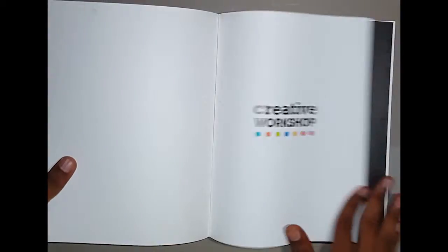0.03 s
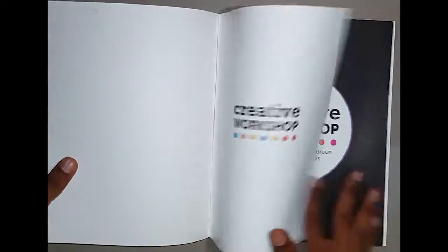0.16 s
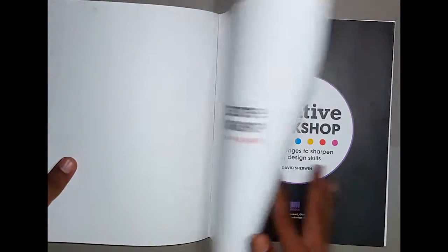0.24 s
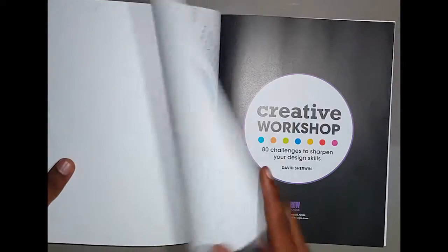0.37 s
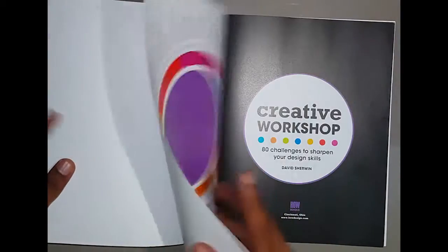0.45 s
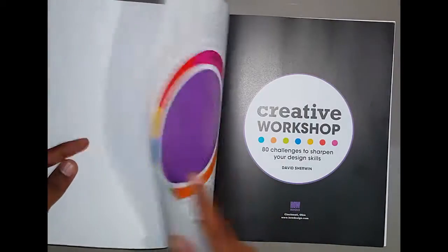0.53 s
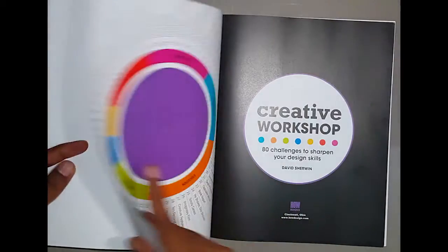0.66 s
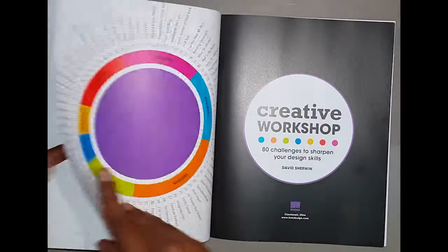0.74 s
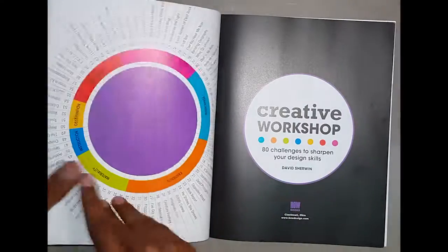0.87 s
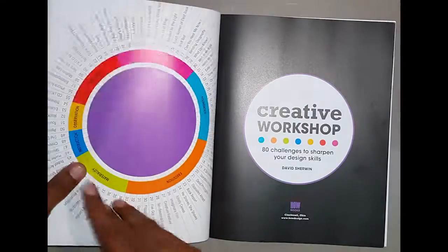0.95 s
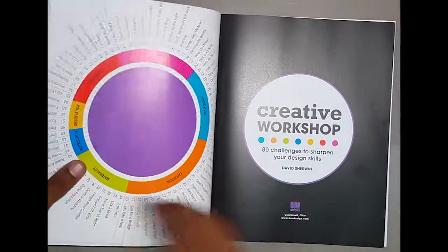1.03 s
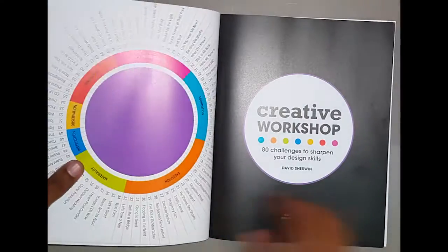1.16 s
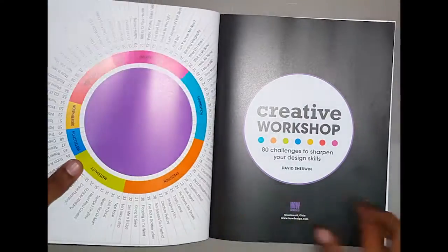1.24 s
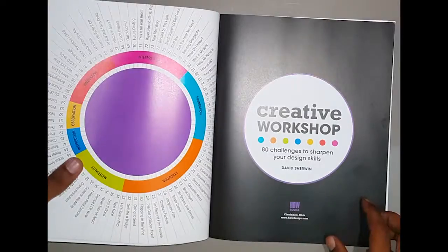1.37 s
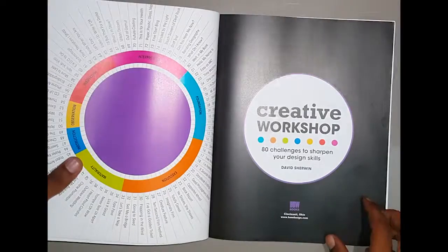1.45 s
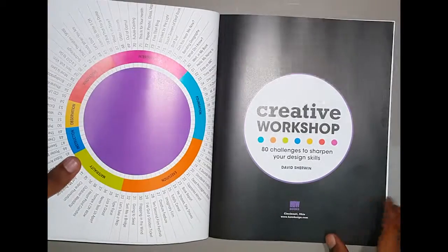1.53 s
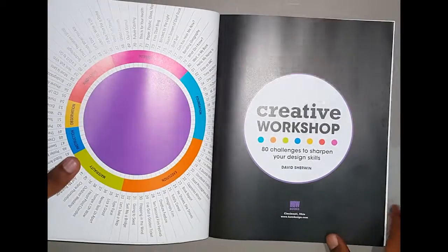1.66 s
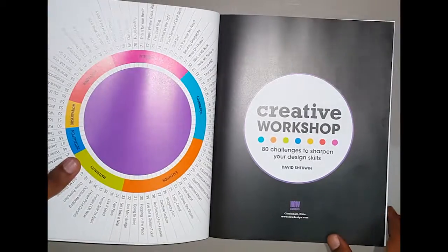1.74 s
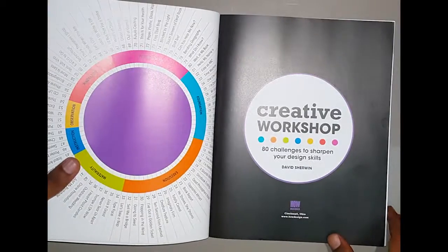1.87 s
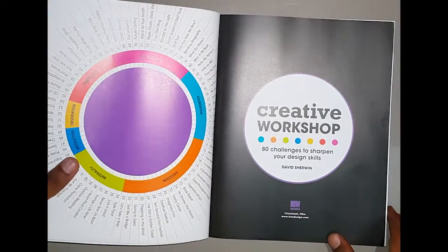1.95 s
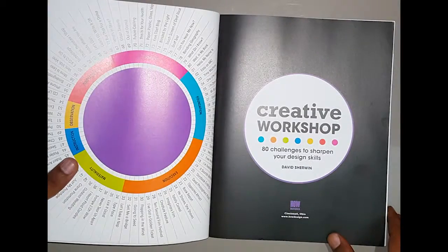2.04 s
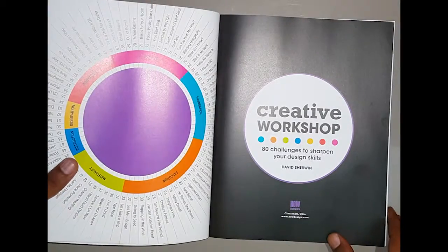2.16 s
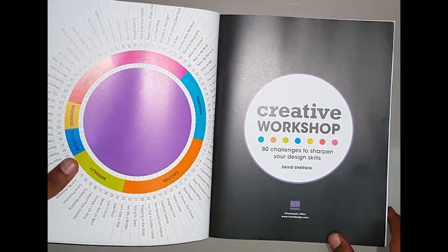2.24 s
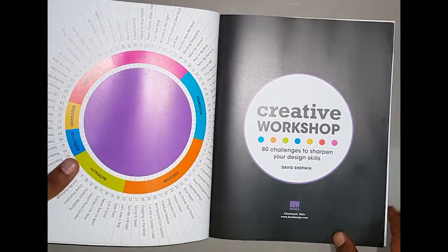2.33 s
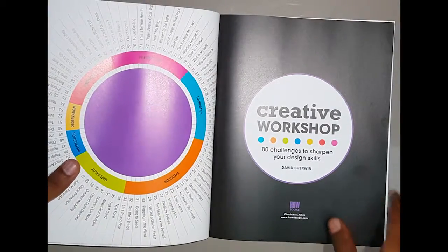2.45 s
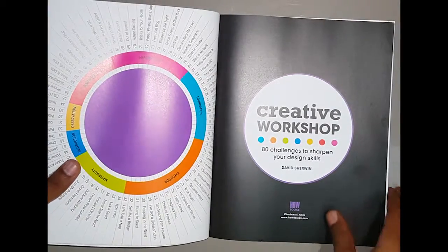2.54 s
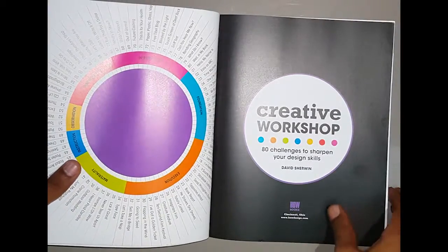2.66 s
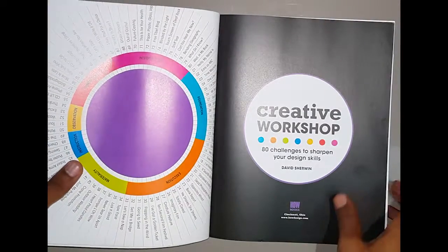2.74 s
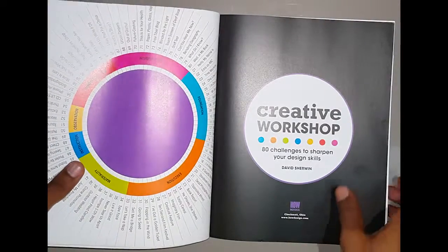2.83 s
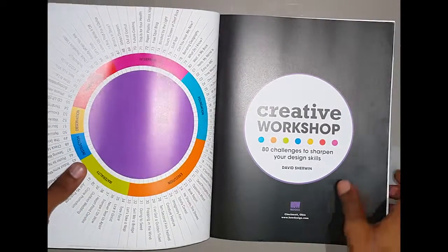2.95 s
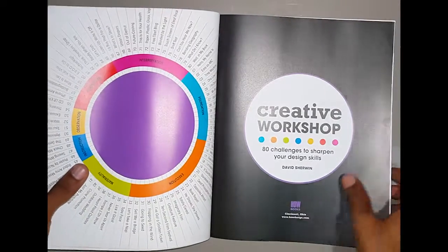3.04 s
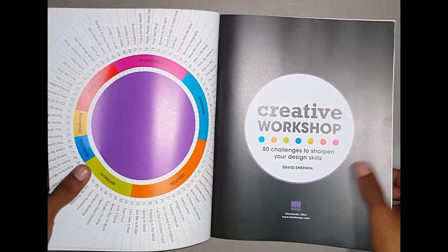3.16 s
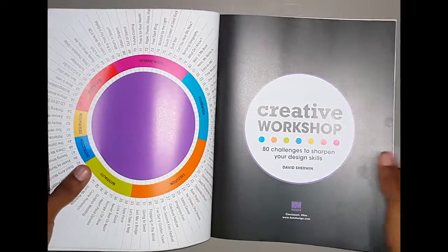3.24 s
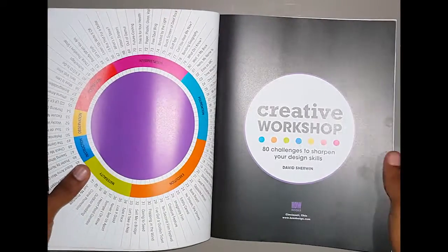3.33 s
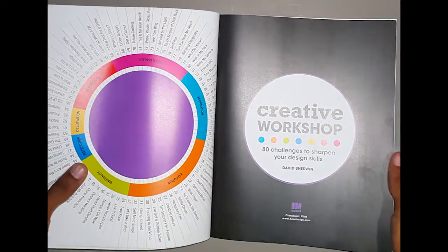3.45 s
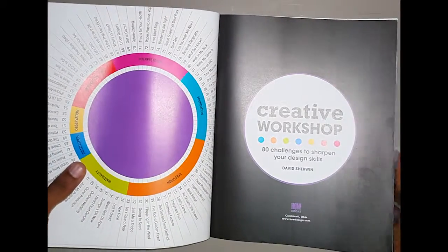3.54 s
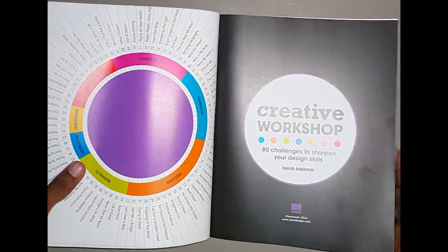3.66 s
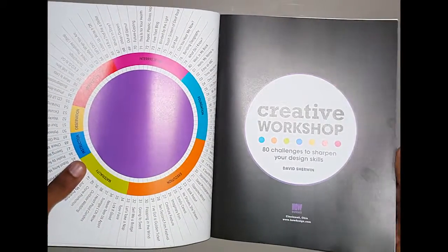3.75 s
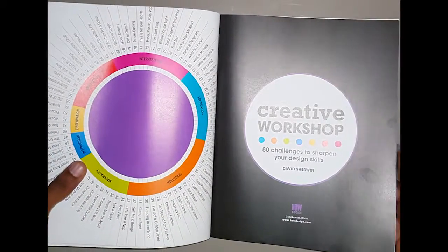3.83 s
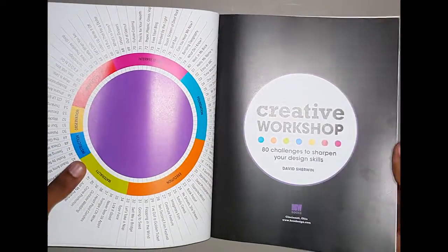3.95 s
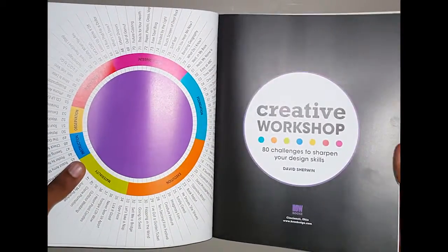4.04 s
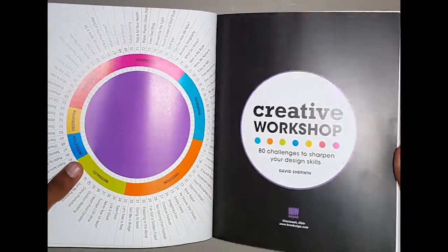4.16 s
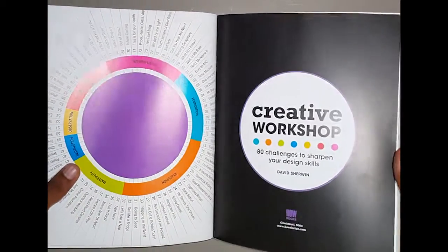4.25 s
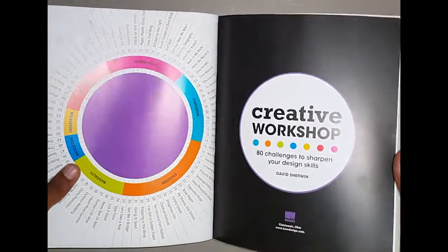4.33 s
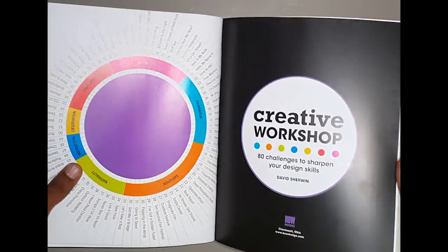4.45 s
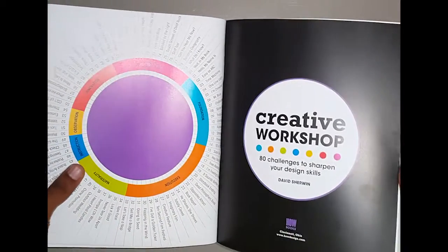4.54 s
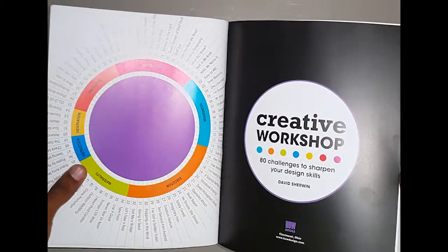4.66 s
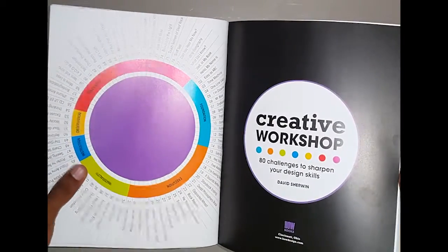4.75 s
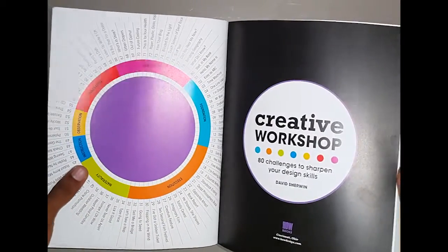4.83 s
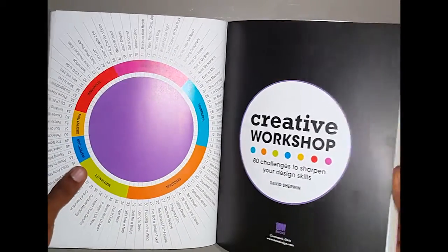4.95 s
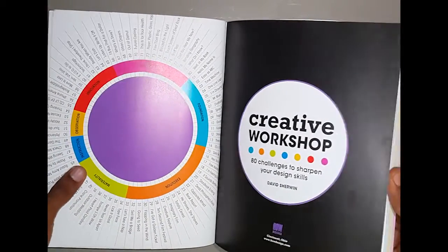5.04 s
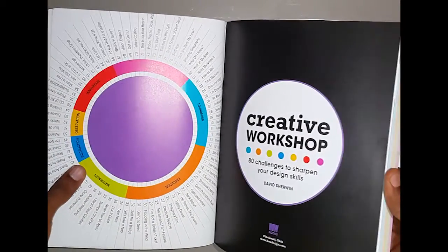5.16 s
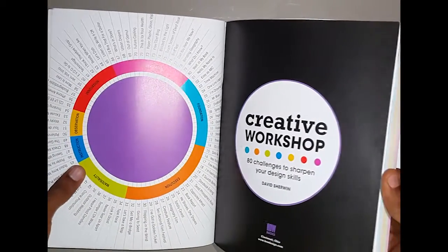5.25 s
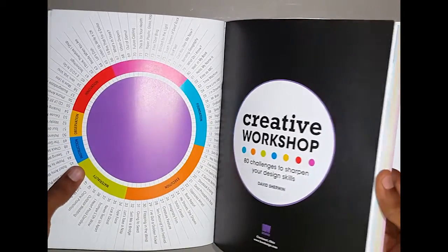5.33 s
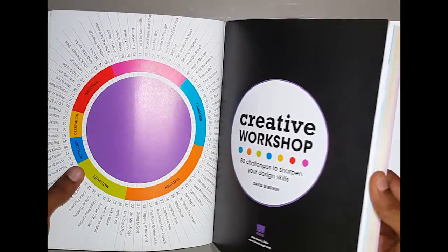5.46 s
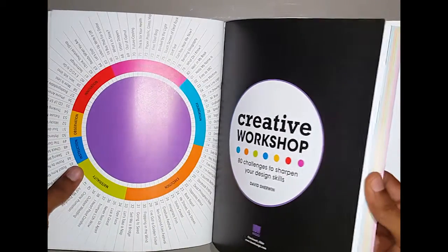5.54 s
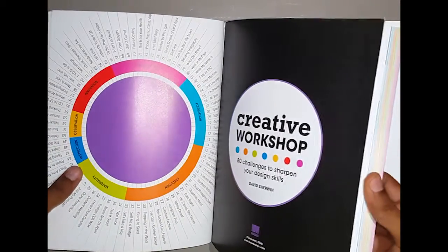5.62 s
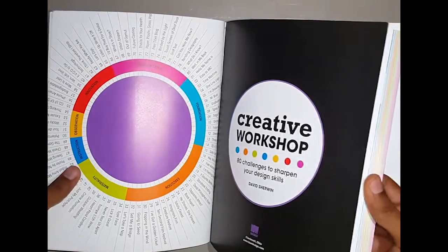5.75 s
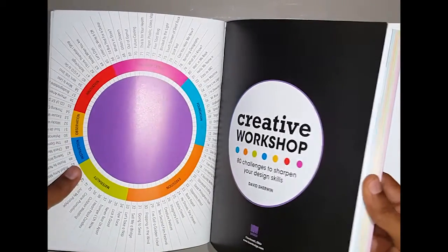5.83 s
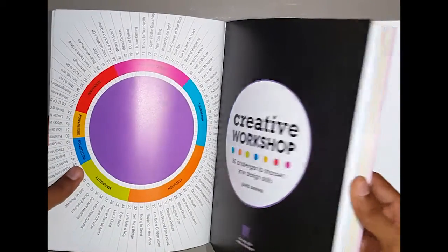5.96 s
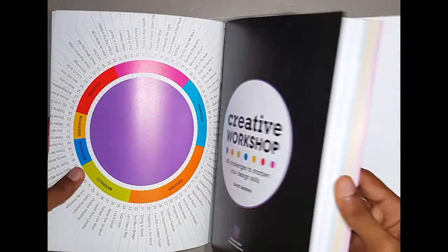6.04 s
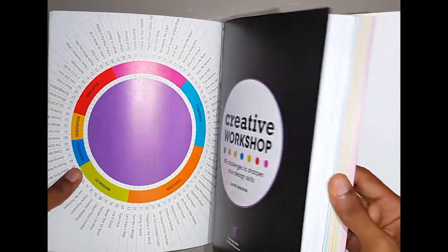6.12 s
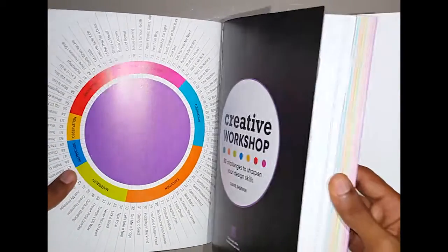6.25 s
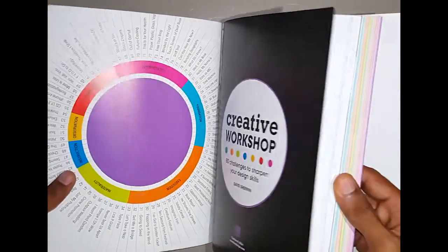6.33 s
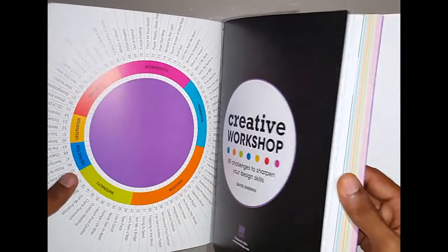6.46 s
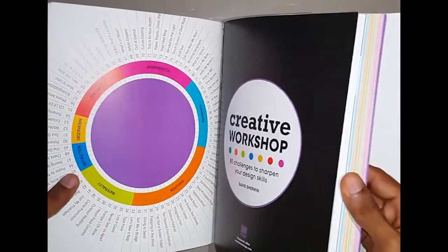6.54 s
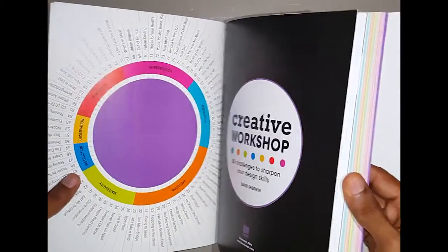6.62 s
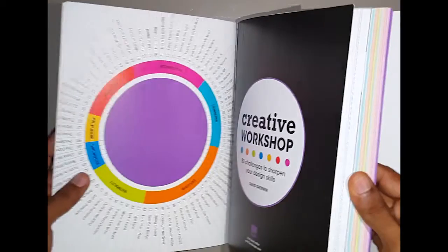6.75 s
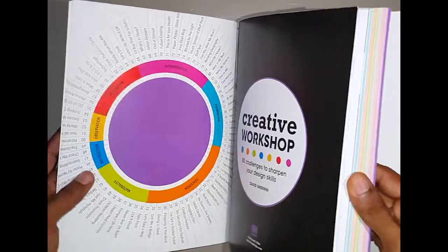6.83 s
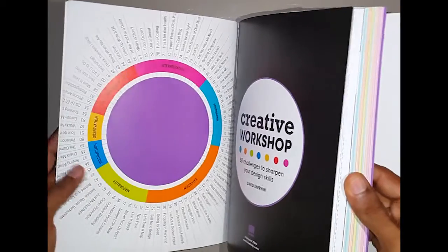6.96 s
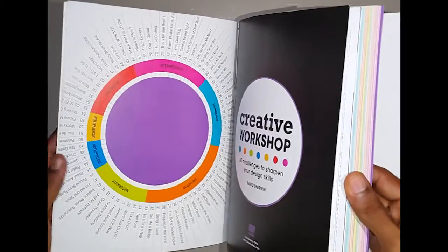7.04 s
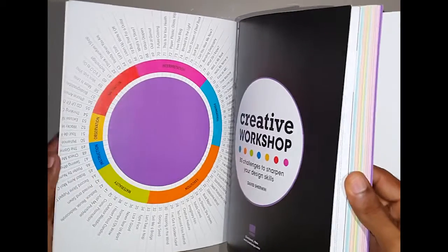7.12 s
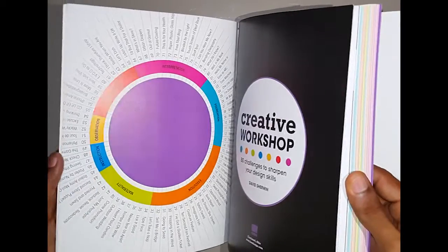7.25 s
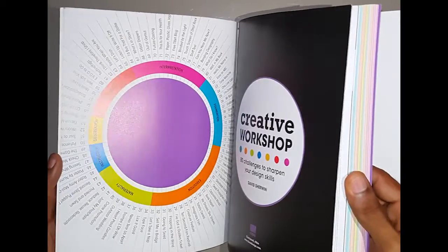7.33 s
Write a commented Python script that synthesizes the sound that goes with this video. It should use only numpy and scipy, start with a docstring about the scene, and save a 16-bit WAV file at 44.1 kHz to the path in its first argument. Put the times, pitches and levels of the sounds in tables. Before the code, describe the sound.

A large paperback page is swished over with crackling snaps and smoothed flat, then quiet handling, soft hollow table thumps and a final heavier knock.

```python
"""In a small room, a large paperback lies open on a hollow wooden table.
One page is turned and smoothed; fingers tap and lift the edge. Paper is shaped noise: grainy hiss for
sliding, dense bursts and clicks for snaps, single resonances for pitched pops, taps and a scrape. Thumps,
shifting weight and the paper drive modes of table and close walls, which two spaced microphone ports hear
with different strength and sign. Behind lie distant rumble, amplifier hiss and faint high tones."""
import sys
import numpy as np
from scipy import signal
from scipy.fft import rfft, irfft
from scipy.io import wavfile
from scipy.ndimage import uniform_filter1d

SR = 44100
rng = np.random.default_rng(int(sys.argv[2]) if len(sys.argv) > 2 else 0)


def inscribe(sig):
    """Save sig as 16-bit PCM at rate SR to the path in sys.argv[1].

    A 1-D sig is mono; a 2-D sig holds one channel per row.
    Samples are clipped to [-1, 1] before scaling.
    """
    pcm = np.round(np.clip(np.atleast_2d(sig).T, -1, 1) * 32767)
    wavfile.write(sys.argv[1], SR, pcm.astype(np.int16))


def level_to_linear(level):
    """Convert decibel levels to linear amplitude factors, elementwise."""
    exponent = np.asarray(level, float) / 20
    return 10 ** exponent


N = 325899

# paper snaps and finger taps: (time [s], level [dB],
# hollow part against that level [dB], sheen against that level [dB])
SNAPS = [(0.1094, -35.5, -6.5, 1.5), (0.2761, -31, 1, -2), (0.3978, -57, 19, -18), (0.5295, -45.5, -14, -2),
         (0.5575, -41.5, 0.5, 7), (0.5895, -29, -6.5, -10), (0.6257, -28.5, -9, -34),
         (0.7035, -49.5, 10.5, 1.5), (0.7775, -45, 4.5, -6), (0.8325, -50, -3, -4.5),
         (0.9938, -49.5, -1, 4), (1.0333, -64, 21.5, -15), (1.0897, -21.5, -6.5, -13),
         (1.4388, -46.5, -10, -7), (1.464, -45, -13.5, -9), (1.641, -41.5, -38, -3.5),
         (2.4428, -38, -46, -12), (2.8816, -58, 2, -12), (2.959, -52.5, 7.5, -11),
         (3.1379, -58.5, 2.5, -37), (3.3067, -57.5, 1, 3), (3.464, -58.5, 3.5, -22),
         (3.8134, -71.5, 19.5, -11), (4.044, -57.5, -1, -2), (4.111, -54.5, -4, -3.5),
         (4.142, -49.5, 5, -26), (4.3179, -48, 5, -36), (4.49, -51.5, -20, 2), (4.905, -35, -11, -1),
         (4.9414, -43.5, 0, 0.5), (5.1066, -53, 4, -24), (5.252, -51, -5, -7), (5.7329, -61.5, 12.5, 4.5),
         (5.7837, -59, 10.5, 3.5), (5.8365, -61, 12.5, 2.5), (6.3285, -63.5, 16, 2), (6.3765, -52, 9, -1),
         (6.4224, -54.5, 6.5, 2), (6.477, -59.5, 7.5, 0), (6.5224, -42.5, 0.5, -10),
         (6.5679, -50, 7.5, -23), (6.819, -42, -1.5, -12.5), (6.9952, -56, 14, 1), (7.1046, -52.5, -10, -6),
         (7.1305, -55, 7, 4.5), (7.2612, -51.5, -1, -21)]
DEEP_BELOW_HZ = 190   # the deep modes of the table


def rms_one(x):
    """Scales to rms 1."""
    return x / np.sqrt(np.mean(x ** 2) + 1e-20)


def at_hz(points, hz):
    """Reads a table by straight lines on a log-frequency axis."""
    table_hz, values = np.transpose(points)
    return np.interp(np.log(np.maximum(hz, 1)), np.log(table_hz), values)


def in_time(rows):
    """Joins the rows of a curve by straight lines in time."""
    s, *columns = np.transpose(rows)
    return [np.interp(np.arange(N) / SR, s, column) for column in columns]


def drift(rate_hz):
    """Slow random wander of spread 1: noise through two equal one-pole low-passes."""
    r = np.exp(-2 * np.pi * rate_hz / SR)
    noise = rng.standard_normal(N + SR)
    settled = signal.lfilter([1], [1, -2 * r, r * r], noise)[SR:]
    return rms_one(settled)


def swell_at(middle_s, length_s):
    """A smooth rise and fall, with the sample at which it starts."""
    return np.hanning(round(length_s * SR)), round((middle_s - length_s / 2) * SR)


def coloured(x, spectrum):
    """Minimum-phase filter with the given dB curve and unit power gain: nothing sounds early."""
    size = 4096
    cepstrum = irfft(np.log(level_to_linear(at_hz(spectrum, np.fft.rfftfreq(size, 1 / SR)))))
    # fold the cepstrum onto positive time
    cepstrum[1:size // 2] *= 2
    cepstrum[size // 2 + 1:] = 0
    pulse = irfft(np.exp(rfft(cepstrum)))
    return signal.fftconvolve(x, pulse / np.sqrt(np.sum(pulse ** 2)))[:N]


def ring(force, hz, t60_s):
    """Two-pole resonance: a unit click starts a wave of height 1; steady pressure makes no sound."""
    r, w = level_to_linear(-60 / (t60_s * SR)), 2 * np.pi * hz / SR
    return signal.lfilter([.5, 0, -.5], [1, -2 * r * np.cos(w), r * r], force + 1e-18)


def paper(slide_db):
    """Sliding is grainy friction, dull from the sheet, bright from its surface; snaps, brushes are bursts."""
    # spectra of the parts: (frequency [Hz], level [dB])
    dull_colour = [(350, -56), (600, -7.5), (821, -1.5), (1000, 2.5), (1170, -7.5), (2180, -3), (3470, -9),
                   (5450, -19.5), (9000, -13), (15600, -19.5), (22000, -120)]
    hollow_colour = [(150, -27), (350, -9.5), (650, -8), (1000, 4), (1200, -5.5), (1500, -13), (4000, -53)]
    crisp_colour = [(600, -12), (1400, 0), (2300, 4.5), (5000, -10), (9000, -39)]
    sheen_colour = [(1470, -15.5), (2500, -3.5), (4040, 9.5), (4900, 4), (5600, 8), (7000, 1.5), (9000, -4),
                    (15500, -7)]
    crackle_db = 4.5   # unevenness of brushes and snaps
    envelopes = snap_envelopes() + brush_envelopes()
    crackle = level_to_linear(crackle_db * drift(250)) * rng.standard_normal((3, N))
    hollow, crisp, sheen = envelopes * crackle
    hollow_clicks, crisp_clicks = snap_clicks()

    dull = level_to_linear(slide_db) * fibres(400, grain_db=-6.5, clump_db=5.5)
    # louder sliding is brighter: the sheen lies 8 dB under the slide at -65 dB
    sheen_db = -8 + 0.8046 * (slide_db + 65)
    bright = level_to_linear(slide_db + sheen_db) * fibres(2900, grain_db=-26.0, clump_db=1.5)

    sound = coloured(dull, dull_colour) + coloured(bright + sheen, sheen_colour)
    sound += coloured(hollow + hollow_clicks, hollow_colour)
    sound += coloured(crisp + crisp_clicks, crisp_colour)
    return sound + whisks() + pitched_paper()


def fibres(per_s, grain_db, clump_db):
    """Friction of paper: smooth hiss with clumped tiny slips on it; rms 1."""
    chance = per_s * level_to_linear(clump_db * drift(20)) / SR
    size = level_to_linear(5.6 * np.minimum(rng.exponential(1, N), 5))
    slips = (rng.random(N) < chance) * size * rng.choice([-1, 1], N)
    hiss = rng.standard_normal(N)
    return rms_one((hiss + level_to_linear(grain_db) * rms_one(slips)) * level_to_linear(0.64 * drift(66)))


def snap_envelopes():
    """Each snap rises fast and dies away: hollow part, crisp part and sheen, each at its own rate."""
    rise_s = 0.00066   # time constant
    t60_s = np.array([[0.014], [0.028], [0.032]])   # hollow, crisp, sheen
    out = np.zeros((3, N))
    for s, level_db, hollow_db, sheen_db in SNAPS:
        at = round(s * SR)
        t = np.arange(min(round(.1 * SR), N - at)) / SR
        rise = 1 - np.exp(-t / rise_s)
        part_db = level_db + np.array([[hollow_db], [0], [sheen_db]])
        out[:, at:at + len(t)] += rise * level_to_linear(part_db - 60 * t / t60_s)
    return out


def snap_clicks():
    """The first contact of each snap is a single click, in the hollow and in the crisp part."""
    s, level_db, hollow_db, _ = np.transpose(SNAPS)
    clicks = np.zeros((2, N))
    clicks[:, np.round(s * SR).astype(int)] = level_to_linear([level_db + hollow_db + 17, level_db + 14])
    return clicks


def brush_envelopes():
    """Fingertips brush the page: each brush swells and fades evenly, with no hollow part."""
    # (middle [s], level [dB], sheen against that level [dB], length [s])
    brushes = [(0.091, -62.5, 3, 0.06), (0.596, -46.5, -38, 0.19), (0.687, -50, -23, 0.077),
               (0.972, -50, -5.5, 0.06), (1.153, -56.5, -16, 0.13), (1.454, -57.5, 8, 0.052),
               (1.539, -62.5, -9, 0.028), (1.633, -61.5, 2, 0.083), (1.693, -58.5, 4, 0.026),
               (1.898, -66, -2, 0.21), (2.092, -64.5, 2.5, 0.051), (2.502, -72, 3, 0.14),
               (2.895, -58, -0.5, 0.06), (4.865, -63.5, -1, 0.02), (5.032, -59.5, 0, 0.086),
               (5.374, -69.5, 1, 0.13), (6.517, -57.5, 4.5, 0.021), (6.705, -61, 1, 0.072),
               (6.787, -64.5, -19, 0.23), (7.064, -69.5, 6.5, 0.051)]
    out = np.zeros((3, N))
    for middle_s, level_db, sheen_db, length_s in brushes:
        swell, at = swell_at(middle_s, length_s)
        out[1:, at:at + len(swell)] += swell * level_to_linear(level_db + np.array([[0], [sheen_db]]))
    return out


def pitched_paper():
    """Buckling pops, taps and a longer scrape: a swell of noise drives one resonance of the sheet."""
    # (middle [s], level [dB], pitch [Hz], length of the swell [s])
    pitched = [(0.281, -32, 913, 0.026), (0.214, -43, 2250, 0.064), (0.563, -35, 2150, 0.022),
               (0.613, -32, 946, 0.021), (0.642, -38, 960, 0.017), (5.036, -54.5, 980, 0.049),
               (5.043, -50, 2180, 0.028), (4.98, -58.5, 4750, 0.29), (5.083, -56.5, 4760, 0.05),
               (5.105, -47, 850, 0.012), (5.108, -48.5, 2000, 0.018), (6.328, -58, 5400, 0.01),
               (6.375, -58, 5650, 0.0088), (6.527, -44, 1970, 0.0086), (6.823, -49.5, 1070, 0.057),
               (7.131, -49.5, 1110, 0.013)]
    ring_cycles = 13   # cycles until the ring has fallen 60 dB
    out, noise = np.zeros(N), rng.standard_normal(N)
    for middle_s, level_db, hz, length_s in pitched:
        swell, at = swell_at(middle_s, length_s)
        force = np.zeros(len(swell) + SR // 20)   # room for the ring to fade
        force[:len(swell)] = swell * noise[at:at + len(swell)]
        sound = ring(force, hz, ring_cycles / hz)
        # the energy follows the swell, whatever the pitch
        gain = np.sqrt(np.sum(swell ** 2) / np.sum(sound ** 2))
        out[at:at + len(sound)] += level_to_linear(level_db) * gain * sound
    return out


def whisks():
    """Page edges whisk past the page below: each is a swell of thin, high hiss."""
    # (middle [s], level before the high-pass [dB], length [s])
    passes = [(0.292, -47.5, 0.32), (0.325, -38.5, 0.12), (0.567, -52, 0.022), (0.588, -47, 0.014),
              (0.684, -50.5, 0.052), (6.828, -55, 0.08)]
    level = np.zeros(N)
    for middle_s, level_db, length_s in passes:
        swell, at = swell_at(middle_s, length_s)
        level[at:at + len(swell)] += swell * level_to_linear(level_db)
    thin = signal.butter(2, 7000, "high", fs=SR, output="sos")
    return signal.sosfilt(thin, level * rng.standard_normal(N))


def table(weight_db, sheet):
    """Thumps, lumpy shifting weight and the paper itself all drive the same modes of table and nook."""
    # (frequency [Hz], t60 [s], left gain [dB], right gain [dB], sign at the right port [+1 or -1])
    modes = [(42.8, 0.52, -21.5, -22.5, 1), (65.4, 0.43, -18, -18, 1), (104.1, 0.25, 2, 0.5, 1),
             (138.6, 0.27, -12, -10, 1), (146.7, 0.16, -0.5, -2, 1), (190, 0.037, -1.5, 1, 1),
             (224.5, 0.21, -12.5, -7, 1), (255, 0.19, -3, 4.5, 1), (350, 0.13, -31.5, -3, 1),
             (394.5, 0.17, -53, -9, 1), (409.4, 0.087, -10, -16, 1), (541.3, 0.16, -4, -2, -1),
             (910, 0.18, -23.5, -39, 1), (1056, 0.091, -17.5, -14, 1), (1294, 0.014, 1, -11.5, -1),
             (2183, 0.017, -10, -7.5, 1), (3008, 0.028, -50, -6.5, 1), (4980, 0.02, -29.5, -8.5, 1)]
    weight_deep_db = 3   # the deep modes take more of the weight
    # once the pages are lifted, the table sways in its lowest modes
    lift_from_s, lift_db, sway_below_hz = 2.6, 9.5, 80
    sway_db = lift_db * (np.arange(N) > lift_from_s * SR)

    lumps = rng.standard_normal((2, N)) * level_to_linear(weight_db - 34.5 + 3.36 * drift(14.0))
    lumps = signal.sosfilt(signal.butter(2, 420, fs=SR, output="sos"), lumps)
    # light paper barely moves the deep modes
    sheet = signal.sosfilt(signal.butter(2, 330, "high", fs=SR, output="sos"), sheet)

    out = np.zeros((2, N))
    for k, (hz, t60_s, left_db, right_db, sign) in enumerate(modes):
        lump_db = (hz < DEEP_BELOW_HZ) * weight_deep_db + (hz < sway_below_hz) * sway_db
        force = thumps(hz) + lumps[k % 2] * level_to_linear(lump_db) + level_to_linear(-26.5) * sheet
        ports = np.array([[level_to_linear(left_db)], [sign * level_to_linear(right_db)]])
        out += ring(force, hz, t60_s) * (-1) ** k * ports   # neighbouring modes start in opposite sense
    return out


def thumps(hz):
    """Soft pushes on one mode; deep and upper modes take shares of their own, by where the blow lands."""
    # (time [s], level [dB], deep modes against that level [dB], upper modes against that level [dB])
    blows = [(0.2761, -35.5, -23, 0), (0.395, -42, -27, 17), (0.53, -46, -30, -2), (0.585, -40, -19, 20),
             (0.625, -28.5, -49, 1), (0.691, -36, -20, -5), (0.8341, -37, -33, 7), (1.001, -55, 4, -6),
             (1.087, -37.5, -3, -12), (1.291, -58.5, -17, 21.5), (1.344, -59, -12, 25.5),
             (1.644, -60, -21, 13), (1.863, -61, 6, 11), (2.446, -60.5, 3.5, 12.5), (2.506, -55, 3.5, 7),
             (2.779, -58, -9, 5), (2.879, -56, 5.5, 12.5), (2.941, -45, -8, 0), (2.956, -24.5, -7.5, 4),
             (3.467, -53.5, -1, -6), (3.578, -61, 11, 7), (3.645, -55, 8.5, 8.5), (3.881, -49.5, -4, -4),
             (4.042, -37, -9, 0.5), (4.271, -29, -3.5, -10), (4.308, -35, -15, -6), (4.336, -38, -2.5, -2),
             (4.491, -46.5, -10, 7), (4.562, -50, -36, 3), (4.683, -47.5, -27, -18), (5.25, -58.5, 5.5, 16),
             (5.796, -46.5, -1, 0), (6.074, -53.5, 2, -6), (6.3289, -50.5, 1.5, 7.5), (6.369, -44.5, -7, 5),
             (6.773, -46, -19, 3), (6.813, -41.5, -13, 3), (6.988, -30, -17, -6), (6.998, -19, 1, -11.5)]
    upper_above_hz = 300
    force = np.zeros(N)
    for s, level_db, deep_db, upper_db in blows:
        contact_s = 0.003 + 0.0001 / (1 + level_to_linear(-29 - level_db))   # every blow presses for about 3 ms
        push, at = np.hanning(max(round(contact_s * SR), 8)), round(s * SR)
        share_db = (hz < DEEP_BELOW_HZ) * deep_db + (hz > upper_above_hz) * upper_db
        chance_db = 2.0 * rng.standard_normal()   # new for each blow and mode
        force[at:at + len(push)] += level_to_linear(level_db + share_db + chance_db) * push / push.sum()
    return force


def room(x, count):
    """The paper sounds from ever-changing spots, each with its own dense reflections at each port."""
    t60_s, wall_cut_hz = 0.12, 4700
    t = np.arange(round(.3 * SR)) / SR
    spot = np.repeat(rng.integers(0, count, N // 512 + 1), 512)[:N]
    walls = signal.butter(1, wall_cut_hz, fs=SR, output="sos")
    out = np.zeros((2, N))
    for k in range(count):
        tails = rng.standard_normal((2, len(t))) * level_to_linear(-60 * t / t60_s) * (t > .001)
        tails = signal.sosfilt(walls, tails)
        tails /= np.sqrt(np.sum(tails ** 2, axis=1, keepdims=True))
        here = uniform_filter1d(1. * (spot == k), size=64)   # short crossfades between spots
        out += signal.oaconvolve(x[None] * here, tails, axes=1)[:, :N]
    return out


def still_room():
    """Distant rumble, more alike at both ports, and amplifier hiss, nearly own to each."""
    # spectrum of the still room: (frequency [Hz], relative level [dB]); then its overall level [dB]
    spectrum, level_db = [(15, -50), (25, -17), (48, -6), (102, -2), (195, -16.5), (249, -3), (301, -17),
                          (516, -20), (1020, -24.5), (1160, -24), (5880, -31.5), (14800, -28), (16000, -24)], -64.5
    # (frequency [Hz], left-right likeness [-1 to 1])
    likeness = [(60, 0.9), (240, 0.14), (950, -0.32), (3770, -0.12), (15000, 0.023)]
    hz = np.fft.rfftfreq(N, 1 / SR)
    alike = np.clip(at_hz(likeness, hz), -1, 1)
    mid, side = rfft(rng.standard_normal((2, N))) * level_to_linear(at_hz(spectrum, hz))
    pair = irfft(np.sqrt(1 + alike) * mid + np.sqrt(1 - alike) * side * [[1], [-1]], N)
    return level_to_linear(level_db) * rms_one(pair)


def whine():
    """Faint high sines whose pitch wavers at random; one fades in late."""
    # (frequency [Hz], level [dB], start [s])
    tones = [(9150, -88, 5.9), (12200, -90, 0), (7350, -92, 0)]
    t, out = np.arange(N) / SR, np.zeros(N)
    for hz, level_db, start_s in tones:
        phase = 2 * np.pi * np.cumsum(hz + 40 * drift(28)) / SR
        fade_in = np.clip((t - start_s) / 0.17, 0, 1)
        out += level_to_linear(level_db) * fade_in * np.sin(phase)
    return out


def scene():
    """Paper reaches the left port first; table and room add their ring."""
    # paper sliding: (time [s], level [dB])
    slide = [(0.0, -59.5), (0.06, -80), (0.13, -51.5), (0.24, -46), (0.37, -52.5), (0.41, -58.5),
             (0.51, -69), (0.57, -68.5), (0.76, -62.5), (0.99, -56.5), (1.21, -65), (1.4, -70.5),
             (2.2, -81.5), (2.9, -77), (4.22, -68), (4.32, -58.5), (4.47, -70.5), (4.5, -59.5),
             (4.88, -68.5), (4.94, -61), (5.09, -62.5), (5.14, -70), (6.09, -72.5), (6.5, -65),
             (6.61, -65.5), (7.14, -68)]
    # weight shifting on the table: (time [s], relative level [dB])
    weight = [(0.0, -61), (0.15, -72), (0.74, -52.5), (1.48, -70.5), (1.65, -61.5), (2.45, -81), (3.0, -59),
              (3.17, -71), (4.15, -56.5), (5.16, -60.5), (5.43, -65), (5.76, -62), (6.38, -67.5),
              (6.5, -56), (6.62, -66), (6.83, -55.5), (6.96, -63), (7.25, -62)]
    port_lag_s, room_db = 0.001123, -6.5
    sheet = paper(*in_time(slide))
    late = np.interp(np.arange(N) - port_lag_s * SR, np.arange(N), sheet)
    direct = np.array([sheet * level_to_linear(-7.0), late * level_to_linear(-16.0)])
    table_ring = table(*in_time(weight), sheet)
    return direct + level_to_linear(room_db) * room(sheet, count=6) + table_ring + still_room() + whine()


def roll_off(x):
    """The treble ends steeply here."""
    return signal.sosfilt(signal.butter(12, 16370, fs=SR, output="sos"), x)


def record(dry):
    """The microphones lose the deepest bass, the top is cut and the converter adds a steady offset."""
    top_cut = signal.cheby2(12, 60, 16500, fs=SR, output="sos")
    bass_cut = signal.butter(2, 60, "high", fs=SR, output="sos")
    offset = -0.0005   # of full scale
    mix = signal.sosfilt(bass_cut, signal.sosfilt(top_cut, dry)) + offset
    return roll_off(mix)


dry = scene()
out = record(dry)
inscribe(out)
```